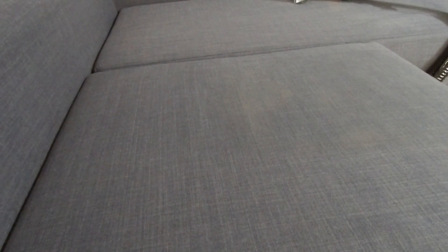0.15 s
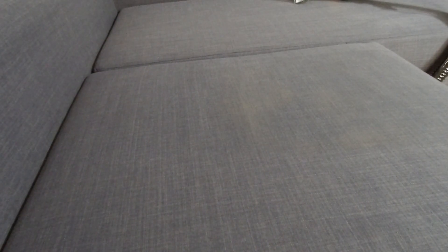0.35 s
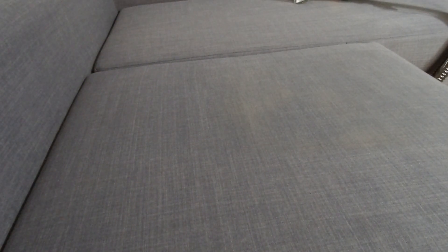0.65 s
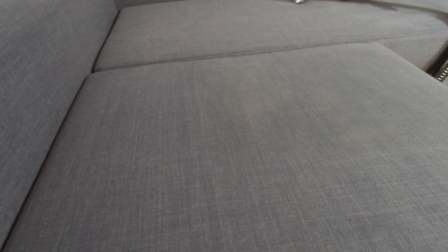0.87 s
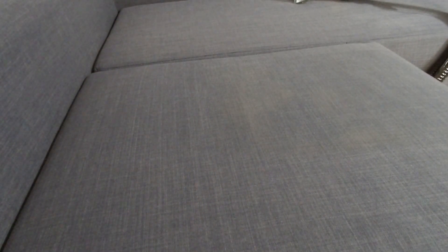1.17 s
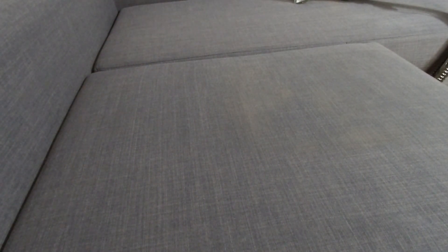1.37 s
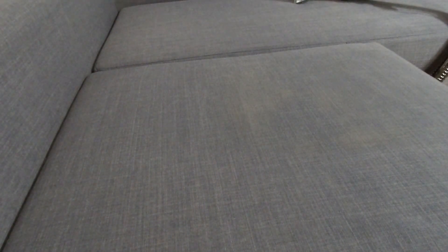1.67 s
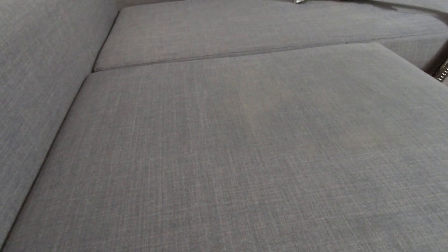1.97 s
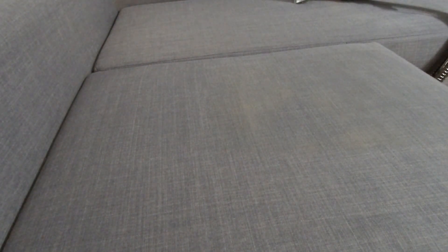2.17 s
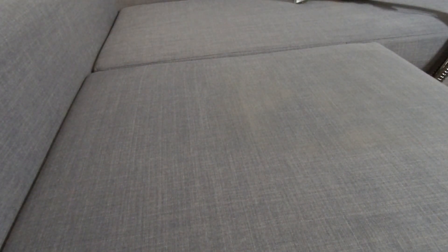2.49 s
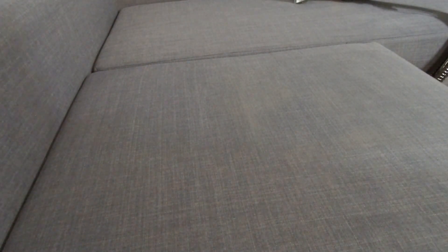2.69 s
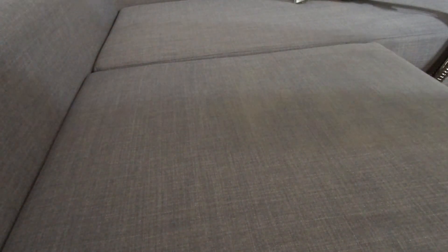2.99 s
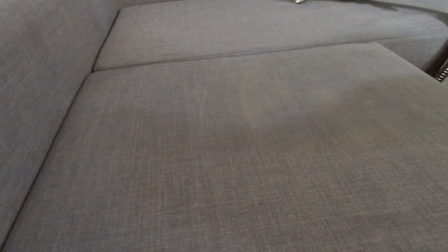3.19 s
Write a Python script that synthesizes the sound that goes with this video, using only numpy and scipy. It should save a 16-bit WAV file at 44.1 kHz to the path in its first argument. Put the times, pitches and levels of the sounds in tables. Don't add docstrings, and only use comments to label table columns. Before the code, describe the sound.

Loud wet-vacuum cleaner runs close by, its motor droning steadily beneath broad hissing airflow

```python
import sys
import numpy as np
from scipy import signal
from scipy.fft import rfft, irfft
from scipy.io import wavfile
from scipy.ndimage import uniform_filter1d

SR = 44100
rng = np.random.default_rng(int(sys.argv[2]) if len(sys.argv) > 2 else 0)


def to_wav(sig):
    pcm = np.clip(np.atleast_2d(sig), -1, 1) * 32767
    pcm = np.round(pcm).astype(np.int16)
    wavfile.write(sys.argv[1], SR, pcm.T)


def ratio(d):
    e = np.asarray(d, float) / 20
    return 10 ** e


N = 147294

# [t/s, airflow level/dB, motor tone level/dB, hose shading/dB]
COURSE = [(.14, -31.5, -28.5, -0.5), (.19, -30, -25.5, 1), (.29, -27, -23, -2.5), (.33, -30, -24, -5),
          (.41, -32, -27, -2), (.51, -30, -27.5, -0.5), (.7, -24.5, -20.5, 0), (.83, -21.5, -17, 0),
          (1.1, -20.5, -19, 0), (1.38, -21, -22.5, 1), (1.44, -21.5, -20.5, 1.5), (1.56, -23.5, -23, 2.5),
          (1.66, -21, -19.5, 1), (2.14, -21.5, -20, 1.5), (2.26, -22, -18, 1.5), (2.45, -21.5, -17.5, 0),
          (3.04, -21.5, -18.5, 0.5), (3.33, -21, -18.5, 1)]
# [f/Hz, level per Hz/dB]
ROAR_SLOPE = [(15, -77), (40, -37.5), (150, -18), (280, -17.5), (520, -14), (1000, -13.5), (1400, -15.5),
              (1520, -31), (2500, -61)]
# [f/Hz, level per Hz/dB]
RUSH_SLOPE = [(850, -40.5), (1450, -9.5), (1530, -6), (2190, -1), (3550, -2.5), (4000, -2), (4400, -2.5),
              (5290, -2.5), (8500, -6), (11000, -14), (18700, -120)]
# [f/Hz, level per Hz/dB]
HISS_SLOPE = [(6000, -19), (8500, -13.5), (9550, -3), (10100, -0.5), (11300, 2), (13800, 0), (14600, -4.5),
              (15400, -2)]
# [f/Hz, width/Hz, lift/dB]
CASING_MODES = [(100, 10, 6), (147, 11, 13), (198, 34, 8), (240, 16, 6), (300, 14, 13), (360, 16, 6),
                (435, 20, 11), (471, 22, 13), (527, 16, 9), (660, 110, 6), (1120, 60, 4), (1201, 30, 8),
                (1255, 40, 10), (1335, 90, 4)]
# [f/Hz, width/Hz, lift/dB]
HOSE_MODES = [(1600, 50, 5), (1824, 18, 10), (1915, 16, 7), (1957, 18, 9), (2033, 18, 7), (2120, 18, 6),
              (2198, 18, 7), (2440, 40, 4), (2770, 22, 6), (3062, 22, 4), (4030, 330, 5), (4650, 40, 4),
              (5280, 90, 3), (7520, 140, 3)]
# [f/Hz, width/Hz, lift/dB]
NOZZLE_MODES = [(10210, 200, 5), (10470, 40, 4), (11000, 120, 4), (11204, 40, 3), (11460, 50, 4),
                (12090, 40, 5), (12250, 80, 4), (12900, 160, 3), (13510, 260, 4), (14200, 200, 3),
                (14830, 60, 3)]
# [shaft order, level/dB, flutter/dB]
SHAFT_ORDERS = [(2, -23, 3), (3, -25, 2), (4, -21, 3), (9, -22, 2), (10, -31, 2), (18, -26, 2)]
# [centre t/s, low f/Hz, high f/Hz, left-right level against the airflow/dB]
SIDE_BANDS = [(.372, 6300, 8300, -12), (.372, 11700, 13100, -6), (.418, 12400, 13800, -9),
              (.998, 11700, 13100, -9), (1.254, 9600, 11000, -6), (1.509, 10300, 12400, -7.5),
              (1.672, 6900, 8940, -11), (1.95, 4200, 5200, -12), (1.95, 5700, 6900, -13),
              (2.136, 13800, 15200, -13), (2.229, 11000, 12400, -9), (2.345, 12400, 13800, -9),
              (2.438, 11700, 13100, -9), (2.438, 5200, 6300, -14), (2.508, 6900, 8300, -12),
              (3.32, 6900, 8300, -13)]


def evened(x):
    return x / np.sqrt(np.mean(x ** 2) + 1e-20)


def course(column):
    rows = np.array(COURSE)
    return np.interp(np.arange(N) / SR, rows[:, 0], rows[:, column])


def drift(per_s):
    t = np.arange(0, N, 64) / SR
    rates = np.geomspace(0.3, per_s, num=24)[:, None]
    waves = np.sin(2 * np.pi * (rates * t + rng.random((24, 1)))) / np.sqrt(rates)
    return np.interp(np.arange(N) / SR, t, evened(waves.sum(0)))


def turbulence():
    patchy_db, flicker_db = -0.1, 0.5
    frames = N // 128 + 5
    real, imaginary, patches = rng.standard_normal((frames, 257, 3)).T
    patches = uniform_filter1d(patches, size=6, axis=0)
    patches = evened(uniform_filter1d(patches, size=20, axis=1))
    flicker = rng.standard_normal(frames)
    spectrum = (real + 1j * imaginary) * ratio(patchy_db * patches + flicker_db * flicker)
    return signal.istft(spectrum, nperseg=512, noverlap=384)[1][:N]


def room(x):
    t60_s, tail_db = 0.25, -13
    taps = np.zeros(8000)
    at = np.arange(80, 7980, 20) + rng.integers(0, 20, size=395)
    taps[at] = rng.choice([-1., 1.], size=395) * ratio(-60 * at / SR / t60_s)
    tail = signal.fftconvolve(x, taps / np.linalg.norm(taps))[:N]
    return evened(x + ratio(tail_db) * tail)


def coloured(x, slope, modes):
    hz = np.fft.rfftfreq(N, 1 / SR)
    f, db = np.transpose(slope)
    lift = 1
    for centre, width, lift_db in modes:
        lift = lift + (ratio(2 * lift_db) - 1) / (1 + (2 * (hz - centre) / width) ** 2) ** 2
    broad = ratio(np.interp(np.log(hz + 1), np.log(f + 1), db, left=-90, right=-90))
    return evened(irfft(rfft(x) * broad * np.sqrt(abs(lift)), N))


def casing_roar(air):
    buffet_db, buffet_per_s = 1.2, 30
    thin_below_hz, thin_db, thin_until_s, full_from_s = 300, -3.5, 0.22, 0.56
    level_db = 0.31 * course(3) + buffet_db * drift(buffet_per_s)
    roar = ratio(level_db) * coloured(air, ROAR_SLOPE, CASING_MODES)
    bass = signal.sosfiltfilt(signal.butter(2, thin_below_hz, fs=SR, output="sos"), roar)
    bass_db = np.interp(np.arange(N) / SR, [thin_until_s, full_from_s], [thin_db, 0])
    return roar - bass * (1 - ratio(bass_db))


def hose_rush(air):
    return ratio(-3 + course(3)) * coloured(air, RUSH_SLOPE, HOSE_MODES)


def nozzle_hiss(air):
    return ratio(-1) * coloured(air, HISS_SLOPE, NOZZLE_MODES)


def airflow():
    air = room(turbulence())
    return ratio(course(1)) * (casing_roar(air) + hose_rush(air) + nozzle_hiss(air))


def motor():
    shaft_hz, waver_hz, waver_per_s, tremble_db = 567.5, 0.35, 6, 0.6
    turn = 2 * np.pi * np.cumsum(shaft_hz + waver_hz * drift(waver_per_s)) / SR
    first = ratio(course(2) + tremble_db * drift(25)) * np.sin(turn)
    upper = np.zeros(N)
    for order, db, flutter_db in SHAFT_ORDERS:
        tone = np.sin(np.round(order) * turn + order)
        upper += ratio(db + flutter_db * drift(12)) * tone
    return np.sqrt(2) * (first + ratio(course(1) + 3) * upper)


def side_noise():
    size = 2048
    hz = np.fft.rfftfreq(size, 1 / SR)
    side = np.zeros(N + size)
    window = signal.windows.kaiser_bessel_derived(size, 4 * np.pi)
    for centre_s, low_hz, high_hz, db in SIDE_BANDS:
        band = (hz > low_hz) * (hz < high_hz)
        burst = evened(irfft(rfft(rng.standard_normal(size)) * band, size))
        at = round(centre_s * SR) - size // 2
        side[at:at + size] += ratio(db) * window * burst
    return side[:N] * ratio(course(1) - 0.5)


def scene():
    return np.tile(airflow() + motor(), (2, 1))


def band_limit(x):
    return signal.sosfilt(signal.butter(12, 15310, fs=SR, output="sos"), x)


def record(dry):
    start_s, fade_in_s = 0.1232, 0.027
    fade = np.clip((np.arange(N) / SR - start_s) / fade_in_s, 0, 1) ** 0.62
    left_right = np.array([[1], [-1]]) * side_noise()
    return band_limit((dry + left_right) * fade)


dry = scene()
out = record(dry)
to_wav(out)
```